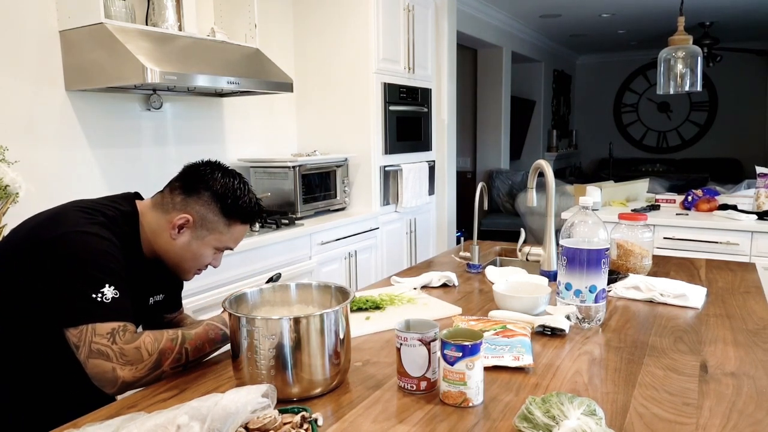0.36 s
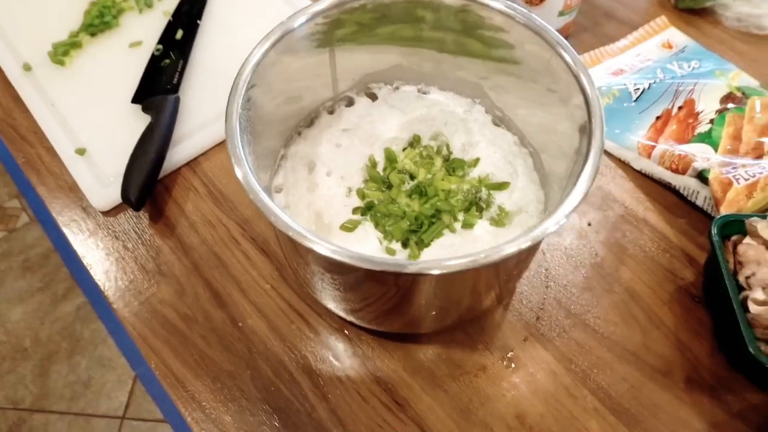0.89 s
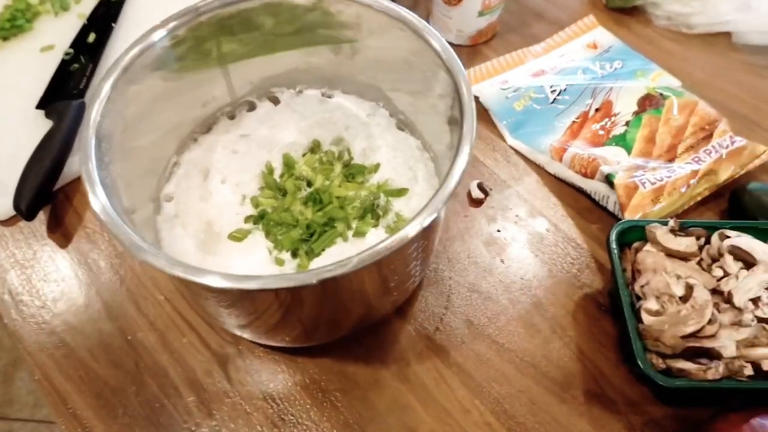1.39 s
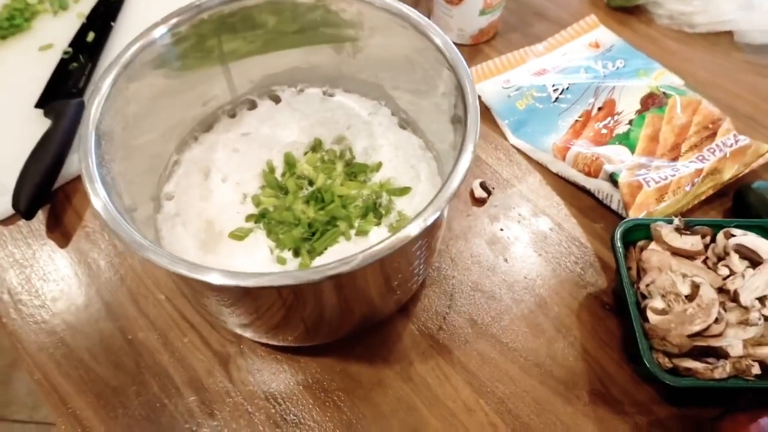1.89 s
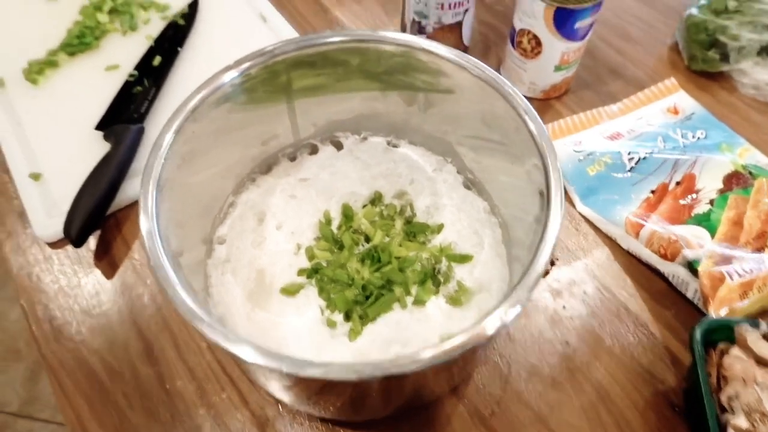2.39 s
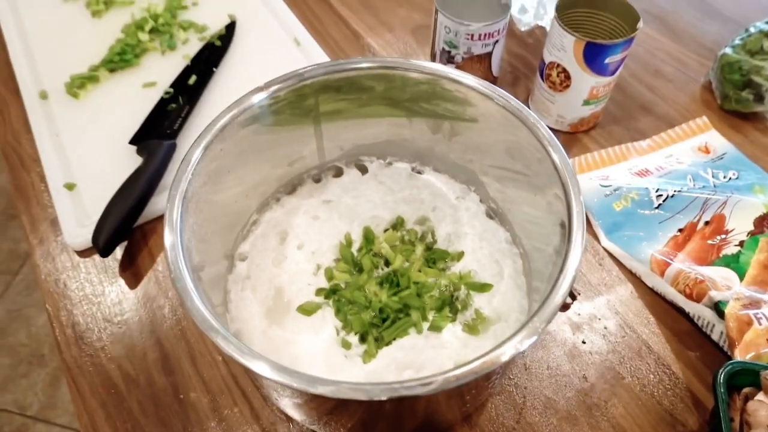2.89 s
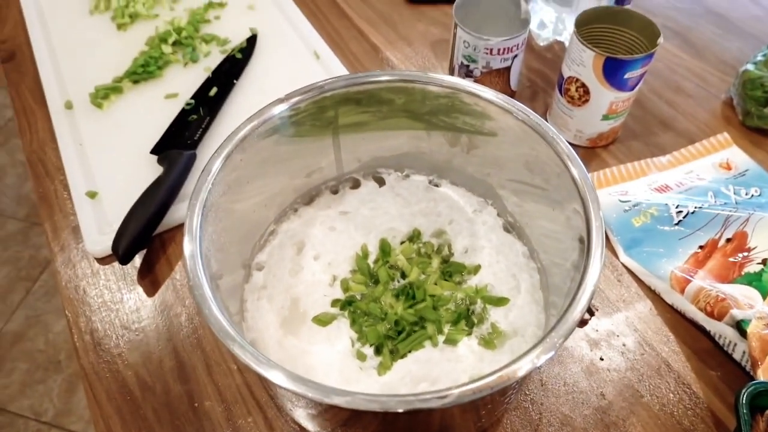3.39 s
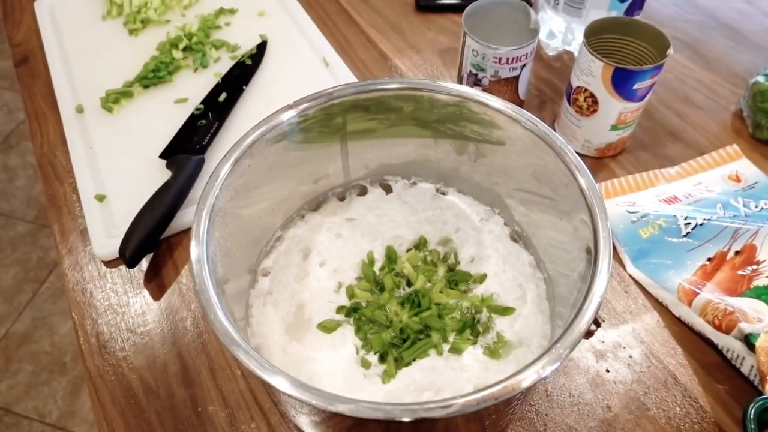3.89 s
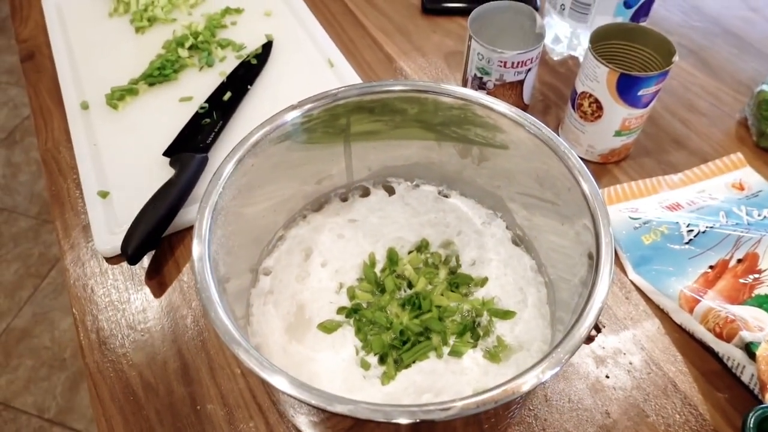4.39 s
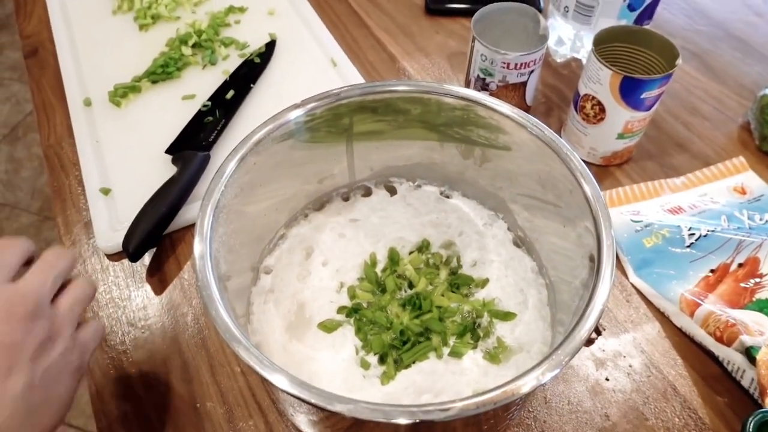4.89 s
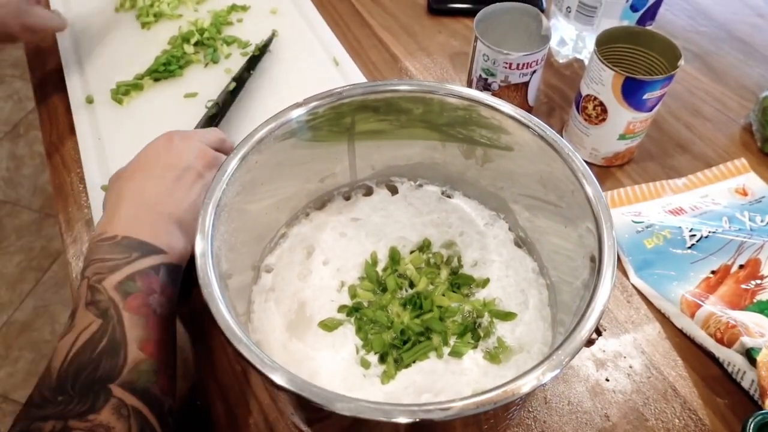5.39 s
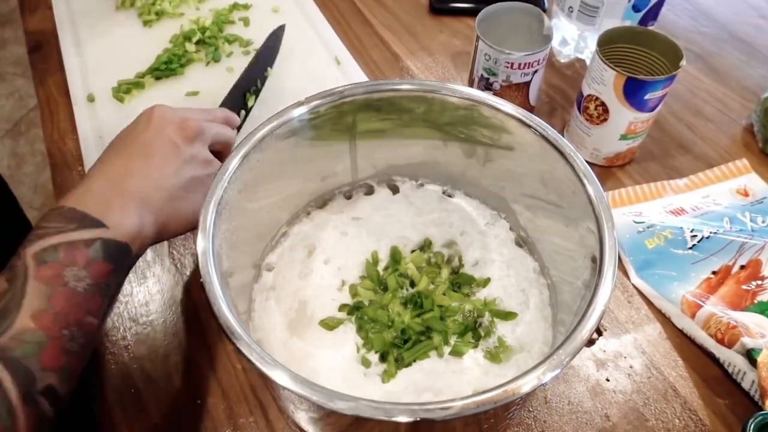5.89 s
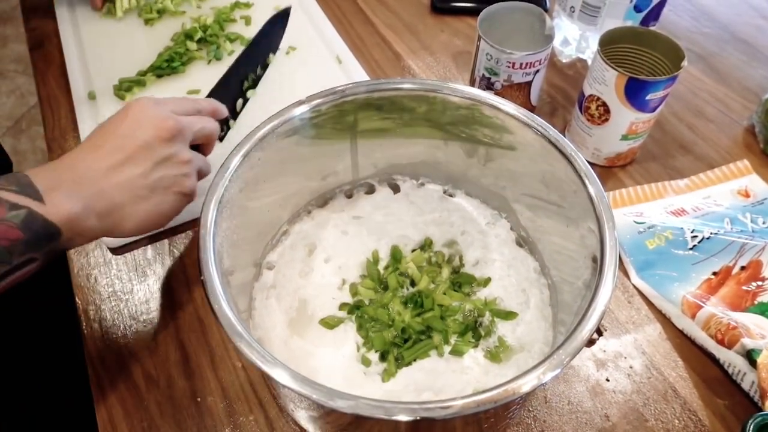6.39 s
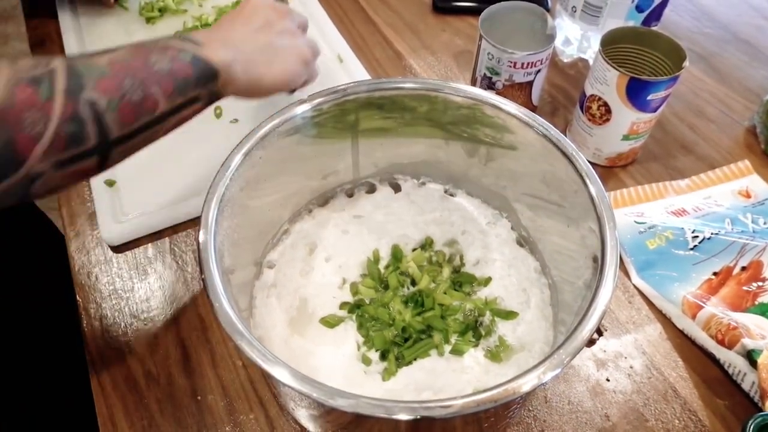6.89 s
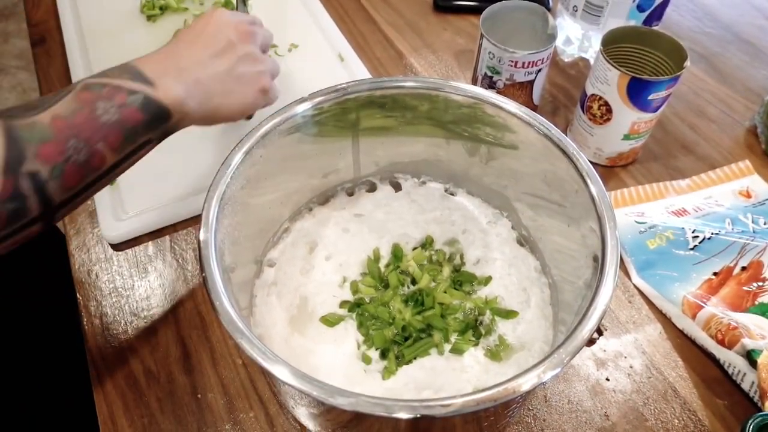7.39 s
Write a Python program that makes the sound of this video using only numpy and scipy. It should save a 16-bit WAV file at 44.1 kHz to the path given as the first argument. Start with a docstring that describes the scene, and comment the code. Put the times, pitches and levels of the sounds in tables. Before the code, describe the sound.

A quiet, hard-walled kitchen, heard close on a small handheld stereo microphone. Faint appliance hum changes abruptly early on as cloth rustles. Irregular hollow knocks and clicks on the microphone's housing follow, with one tiny creak. After a lull with faint brushes, a knife cracks and scrapes on a plastic board in four quick, loud strokes, leaving a short room tail, then a light late contact with a faint ring.

```python
"""Knife and board in a quiet kitchen

A hard-walled kitchen, heard close through a small hand-held stereo microphone. Hum lines waver over steady
shaped noise, and both switch at once to another balance at 0.70 s; cloth rustles in dense grains; pulses and
noise bursts knock and creak the housing in the hand. Then a knife lands and drags on a plastic board: cracks
and chattering clicks ring the board's modes, clear rings and rough buzzes sound on, and a tail of diffuse
noise answers from the room."""
import sys
import numpy as np
from scipy import signal
from scipy.fft import rfft, irfft, next_fast_len
from scipy.io import wavfile
from scipy.ndimage import uniform_filter1d

SR = 44100
rng = np.random.default_rng(int(sys.argv[2]) if len(sys.argv) > 2 else 0)


def output_pcm(signal):
    """Save a mono or channel-first signal as 16-bit PCM at the path in sys.argv[1].

    Samples are clipped to [-1, 1] before scaling.
    """
    pcm = np.clip(np.atleast_2d(signal).T, -1, 1) * 32767
    wavfile.write(sys.argv[1], SR, np.round(pcm).astype(np.int16))


def natural_amplitude(level_db):
    """Convert a level in decibels to a linear amplitude factor, elementwise."""
    exponent = np.asarray(level_db, float) / 20
    return 10 ** exponent


N = 332113

# Knife meeting the board. Each row: start in seconds, landing level in dB, hardness in dB,
# drag level in dB, drag length in seconds.
KNIFE_STROKES = [(5.538, -36.5, -23, -32.5, 0.02), (5.8385, -14, -2.5, -16.5, 0.13),
                 (5.9857, -13.5, -7.5, -16.5, 0.072), (6.1311, -16.5, 3, -15, 0.13),
                 (6.2631, -14.5, -3.5, -17.5, 0.079), (6.962, -54, -1, -37.5, 0.116)]
# Modes of the plastic board. Each row: frequency in Hz, level in dB, decay time t60 in seconds.
BOARD_MODES = [(185, -23.5, 0.069), (271, -5, 0.0037), (455, -6.5, 0.034), (544, 0, 0.006),
               (804, -3.5, 0.025), (1163, 1, 0.01), (1530, 1, 0.0073), (2240, -4, 0.0046),
               (3300, -16, 0.0034), (3860, -15, 0.0059), (5340, -12.5, 0.0017)]
# Colour of the blade edge's hiss. Each row: frequency in Hz, density in dB per Hz.
EDGE_COLOUR = [(1500, -9.5), (3000, -0.5), (6000, -16.5), (10000, -22.5), (15500, -28.5)]
# Short ringing contacts as the knife lands. Each row: start in seconds, level in dB,
# dullness in dB lost per octave above 1 kHz.
KNIFE_CONTACTS = [(5.5373, -27.5, 2), (5.5435, -48.5, 12), (5.556, -46, 12), (6.9658, -28.5, -6),
                  (6.974, -40, -10), (6.9809, -27, 0.5)]
# Modes of the knife. Each row: frequency in Hz, level in dB, decay time t60 in seconds.
KNIFE_MODES = [(250, 0.5, 0.013), (850, 2, 0.012), (1480, 2, 0.015), (2000, -6, 0.0124), (2480, -14, 0.01),
               (3780, -12, 0.0043)]
# Short pitched ticks, and longer clear rings after the last knife stroke. Each row: start in seconds,
# frequency in Hz, level in dB, decay time t60 in seconds.
PITCHED_RINGS = [(1.921, 891, -18, .04), (7.015, 1319, -36.5, 0.75), (6.995, 4590, -51, 0.4),
                 (4.979, 2270, -46, 0.014), (1.949, 4050, -38.5, 0.018), (1.977, 2900, -42, 0.017),
                 (3.572, 1340, -45, 0.08), (6.996, 807, -42, 0.5), (6.995, 3620, -58, 0.3),
                 (6.995, 4040, -56, 0.33)]
# Rough narrow buzzes. Each row: start in seconds, frequency in Hz, level in dB, decay time t60 in seconds.
ROUGH_RATTLES = [(1.776, 955, -37, 0.37), (1.772, 1435, -41, 0.41), (2.385, 3200, -53, 0.65),
                 (5.233, 1170, -51.5, 0.25), (5.385, 2610, -54, 0.23), (5.566, 785, -38.5, 0.3)]
# Knocks on the microphone housing. Each row: start in seconds, clatter level in dB, hollow thud level in dB,
# bright tick level in dB, thud pitch in Hz.
HOUSING_KNOCKS = [(0.787, -25.5, -26, -38, 210), (0.895, -45, -64, -17.5, 196),
                  (1.129, -25.5, -36, -36, 237), (1.247, -56, -33, -37, 224), (1.358, -33, -31, -47, 243),
                  (1.451, -44, -43, -40, 246), (1.474, -26, -29.5, -61, 230),
                  (1.494, -19, -26.5, -30.5, 224), (1.531, -34, -40, -48, 264),
                  (1.544, -29.5, -36, -42, 258), (1.663, -29, -30.5, -36, 292),
                  (1.673, -19.5, -29.5, -26, 232), (1.704, -28, -26.5, -41, 232),
                  (1.765, -19.5, -36.5, -21, 237), (1.895, -23, -28.5, -30, 232),
                  (1.9198, -19.5, -33, -32, 298), (1.949, -31, -33, -29.5, 364),
                  (1.977, -26.5, -32, -35, 225), (2.055, -85, -35.5, -44, 311), (2.119, -76, -33, -70, 282),
                  (2.321, -36.5, -37, -44, 246), (2.356, -25, -32, -70, 348),
                  (2.377, -18.5, -27.5, -25, 247), (2.396, -29, -56, -66, 247),
                  (2.417, -36, -30.5, -64, 275), (2.472, -29.5, -49, -42.5, 302),
                  (2.508, -69, -30.5, -83, 237), (2.550, -35, -42.5, -50, 230), (2.593, -39, -41, -51, 250),
                  (2.638, -35.5, -41, -53, 210), (2.724, -36.5, -40.5, -49, 225),
                  (3.574, -39, -45, -44.5, 210)]
# A creak of the grip. Each row: time in seconds, slips per second, level in dB.
GRIP_CREAK = [(2.121, 240, -66), (2.125, 280, -44), (2.14, 344, -35.5), (2.160, 350, -35),
              (2.172, 390, -45)]
# Modes of the creaking housing. Each row: frequency in Hz, level in dB, decay time t60 in seconds.
CREAK_MODES = [(318, 9.5, 0.026), (960, -4, 0.0036), (1837, -5.5, 0.031), (2670, 0, 0.0017),
               (4030, 1.5, 0.0063), (4500, -2, 0.0055)]
# A long rub of cloth close to the microphone. Each row: time in seconds, level in dB, brightness in dB.
CLOTH_RUB = [(.698, -66, -2.5), (.715, -29.5, 1.5), (.90, -29.5, 1.5), (.94, -31.5, 2), (1.13, -39, 0.5),
             (1.16, -39, 4), (1.24, -36, 4.5), (1.30, -45, 4.5), (1.37, -53.5, 1), (1.5, -60, 4.5),
             (1.9, -59, -24)]
# Short brushes of hand, cloth and blade. Each row: time of full strength in seconds, rise in seconds,
# hold in seconds, level in dB, grain size from 0 (fine) to 2 (coarse).
SHORT_BRUSHES = [(2.724, 0.054, 0.088, -61, 0.5), (3.97, 0.11, 0.036, -55.5, 1.57),
                 (4.636, 0.015, 0.033, -39.5, 0.38), (4.698, 0.086, 0.0039, -34, 1.1),
                 (4.729, 0.019, 0.0031, -33.5, 0.35), (5.147, 0.077, 0.0082, -58, 1.55),
                 (5.226, 0.023, 0.016, -52, 1.64), (5.366, 0.1, 0.091, -53.5, 1.76),
                 (5.515, 0.088, 0.12, -52.5, 0.084), (5.775, 0.013, 0.015, -40.5, 0.74),
                 (6.982, 0.019, 0.058, -38.5, 0.25)]
# Colours of the fine, middle and coarse grains. Each row: frequency in Hz, density in dB per Hz.
FINE_COLOUR = [(6000, -21.5), (9000, -5.5), (12000, -6.5), (15900, -8), (16300, -50)]
MIDDLE_COLOUR = [(2000, -8), (3800, 0), (5500, 0.5), (8000, -3.5), (11000, -29)]
COARSE_COLOUR = [(250, -20.5), (700, -11), (1200, -10), (2500, -11.5), (5000, -24)]
# Sound from all sides at the two capsules. Each row: frequency in Hz, left-right likeness from -1 to 1.
ALL_SIDES_LIKENESS = [(60, .99), (290, .8), (640, .85), (1410, .7), (3100, .3), (6820, -.29), (15000, .25)]
# How long the room rings. Each row: frequency in Hz, decay time t60 in seconds.
ROOM_DECAY = [(150, 0.41), (500, 0.68), (2000, 0.68), (8000, 0.63)]
# The room's ring at the two capsules. Each row: frequency in Hz, left-right likeness from -1 to 1.
ROOM_RING_LIKENESS = [(60, 0.99), (290, 0.98), (640, 0.9), (1410, 0.58), (3100, 0.4), (6820, -0.03),
                      (15000, 0.31)]
# Appliance hum lines. Each row: frequency in Hz, level before the switch in dB rms,
# level after the switch in dB rms, width in Hz.
HUM_LINES = [(58.7, -64.5, -62.5, 3.08), (181, -59.5, -72.5, 9.1), (210, -58, -53.5, 4.37),
             (273, -53, -58.5, 4.22), (367.4, -59, -55, 3.24), (422, -63, -62, 5.9), (573, -88, -68, 3.7),
             (1360, -90, -76, 14.3)]
# Room air and hiss before and after the switch. Each row: frequency in Hz, density in dB per Hz.
FIRST_AIR_COLOUR = [(15, -61), (25, -41), (49, -13.5), (236, -13.5), (270, -7.5), (531, -21.5), (754, -20),
                    (1330, -31), (1700, -34), (5000, -46), (16000, -46.5)]
SECOND_AIR_COLOUR = [(15, -80.5), (25, -40), (53, -12.5), (92, -15), (212, -6.5), (242, -9.5), (363, -6.5),
                     (476, -11.5), (575, -19.5), (840, -22.5), (1330, -27.5), (4000, -37), (16000, -40.5)]
# Room air at the two capsules. Each row: frequency in Hz, left-right likeness from -1 to 1.
ROOM_AIR_LIKENESS = [(40, .997), (180, .98), (400, .9), (1400, .2), (5000, -.05), (15000, .09)]


def rms_one(x):
    """Scale to unit rms."""
    return x / np.sqrt(np.mean(x ** 2) + 1e-20)


def in_time(rows, outside):
    """Columns of a curve at every sample."""
    s, *columns = np.transpose(rows)
    return [np.interp(np.arange(N) / SR, s, c, outside, outside) for c in columns]


def at_hz(points, hz):
    """Read a table on a log-frequency axis."""
    table_hz, values = np.transpose(points)
    return np.interp(np.log(hz + 1), np.log(table_hz), values)


def band(x, low_hz, high_hz):
    """Second-order band-pass."""
    return signal.sosfilt(signal.butter(2, [low_hz, high_hz], "band", fs=SR, output="sos"), x)


def coloured(pair, spectrum, likeness):
    """Two unrelated noises become a left and right of given colour and likeness; joint rms 1."""
    size = next_fast_len(pair.shape[1])
    hz = np.arange(size // 2 + 1) * SR / size
    alike = np.clip(at_hz(likeness, hz), -.999, .999)
    mid, side = rfft(pair, size) * natural_amplitude(at_hz(spectrum, hz))
    mid, side = np.sqrt(1 + alike) * mid, np.sqrt(1 - alike) * side
    return rms_one(irfft([mid + side, mid - side], size)[:, :pair.shape[1]])


def drift(rate):
    """Slow chance: normal draws of spread 1, `rate` per second, joined by straight lines."""
    steps = rng.standard_normal(int(N / SR * rate) + 2)
    return np.interp(np.arange(N), np.linspace(0, N, len(steps)), steps)


def ring(clicks, hz, t60):
    """A damped resonance: a unit click starts a sine of height 1 that dies in t60, 2 ms at the least."""
    radius = natural_amplitude(-60 / (max(t60, .002) * SR))
    w = 2 * np.pi * hz / SR
    return signal.lfilter([0, np.sin(w)], [1, -2 * radius * np.cos(w), radius ** 2], clicks + 1e-18)


def grains(per_s, spread_db):
    """Random clicks of uneven size and sign, in two unrelated draws."""
    sizes = natural_amplitude(spread_db * np.minimum(rng.exponential(1, (2, N)), 5)) * rng.choice([-1, 1], (2, N))
    return sizes * (rng.random((2, N)) < per_s / SR)


def board(clicks):
    """The plastic board: parallel damped modes of alternating sign."""
    return sum((-1) ** k * natural_amplitude(db) * ring(clicks, hz, t60)
               for k, (hz, db, t60) in enumerate(BOARD_MODES))


def knife():
    """The blade lands with a crack, then chatters over the board in dense clicks that ring its modes."""
    drag_loss_db, bite_s, lift_s = 8, 0.0058, 0.007   # loss over a drag; time to bite; time to lift off
    t = np.arange(N) / SR
    drag, bright, landing, hard = np.zeros((4, N))
    for s, landing_db, hard_db, drag_db, length in KNIFE_STROKES:
        since = t - s
        lift = np.clip((length - since) / lift_s, 0, 1)
        bite = (1 - .5 * np.exp(-np.abs(since) / bite_s)) * (since >= 0)
        pressure = bite * lift * natural_amplitude(drag_db - drag_loss_db * np.clip(since / length, 0, 1))
        drag += pressure
        # harder strokes hiss more and crack brighter
        bright += pressure * natural_amplitude(hard_db)
        at = round(s * SR)
        landing[at] = natural_amplitude(landing_db)
        hard[at] = natural_amplitude(landing_db + hard_db)
    chatter = grains(2600, spread_db=3.5)[0] * natural_amplitude(2.0 * drift(90))
    scale = np.sqrt(np.mean(board(chatter) ** 2))
    edge = coloured(grains(4000, spread_db=4.0), EDGE_COLOUR, [(100, 1), (16000, 1)])[0]
    body = natural_amplitude(29.5) * band(band(band(landing, 90, 2200), 90, 2200), 90, 2200)
    crack = natural_amplitude(24.5) * band(hard, 1800, 4400) + natural_amplitude(1.5) * band(hard, 5500, 15000)
    blow = body + crack + natural_amplitude(-6.0) * band(board(landing), 152, 3170)
    return board(chatter * drag) / scale + natural_amplitude(-10.5) * bright * edge + blow


def knife_contacts():
    """Each contact rings the knife's modes with strengths of its own; dull ones favour the low modes."""
    s, db, dull_db = np.transpose(KNIFE_CONTACTS)
    chance = rng.standard_normal((len(s), len(KNIFE_MODES)))
    at = np.round(s * SR).astype(int)
    out = 0
    for k, (hz, mode_db, t60) in enumerate(KNIFE_MODES):
        clicks = np.zeros(N)
        clicks[at] = natural_amplitude(db + mode_db - dull_db * np.log2(hz / 1000) + 1.5 * chance[:, k])
        out = out + ring(clicks, hz, t60)
    return out


def dying(s, db, t60):
    """Envelope: a very short rise, then exponential decay."""
    since = np.arange(N) / SR - s
    return np.clip(since / 0.00063, 0, 1) * natural_amplitude(db - 60 * np.clip(since, 0, None) / t60)


def narrow(hz, t60):
    """Noise through one resonance twice; rms 1."""
    return rms_one(ring(ring(rng.standard_normal(N), hz, t60), hz, t60))


def rings_and_rattles():
    """A ring is a sine amid narrow noise at its pitch, so it wobbles as it dies; a rattle is wider noise alone."""
    crowd, rattle_t60 = .5, .012   # level of noise around a ring's sine; seconds a rattle's resonance sounds
    t = np.arange(N) / SR
    out = np.zeros(N)
    for s, hz, db, t60 in PITCHED_RINGS:
        out += dying(s, db, t60) * (np.sin(2 * np.pi * hz * t) + crowd * narrow(hz, .05))
    for s, hz, db, t60 in ROUGH_RATTLES:
        out += dying(s, db, t60) * narrow(hz, rattle_t60)
    return out


def placed(x, left_db, lag):
    """A near source: left louder by left_db and later by `lag` samples (earlier where negative)."""
    i = np.arange(N)
    return np.array([natural_amplitude(left_db / 2) * np.interp(i - lag, i, x), natural_amplitude(-left_db / 2) * x])


def knocks():
    """Each knock: a hollow thud that swells, a contact and brief clatter in a broad resonance, a bright tick."""
    modes_hz, clatter_t60 = np.array([907, 1343]), .02   # the two clatter modes; seconds
    even_at_db = -5   # sets the tick level, against the clatter, at which the modes are equal
    t, out = np.arange(3000) / SR, np.zeros(N)
    noise = rng.standard_normal((len(HOUSING_KNOCKS), 2, len(t)))
    for (s, clatter_db, thud_db, tick_db, thud_hz), (rough, sharp) in zip(HOUSING_KNOCKS, noise):
        thud = t / 0.0076 * np.exp(1 - t / 0.0067) * np.sin(2 * np.pi * thud_hz * t)
        contact = rough * t * np.exp(-t / 0.0021)   # builds over a moment
        # each knock's two clatter modes are shifted at random by up to 7 %
        low_hz, high_hz = modes_hz * (1 + .07 * np.tanh(rough[-2:]))
        # brighter knocks favour the upper mode
        upper = 1 / (1 + natural_amplitude(clatter_db + even_at_db - tick_db))
        low_mode = (1 - upper) * ring(contact, low_hz, clatter_t60)
        high_mode = upper * ring(contact, high_hz, clatter_t60)
        burst = low_mode + high_mode + 15.4 * upper * band(band(contact, 750, 2350), 900, 2260)
        tick = band(sharp, 1500, 4500) * np.exp(-t / 0.007)
        at = round(s * SR)
        out[at - 100:at + 2900] += natural_amplitude(thud_db + 4) * thud   # the swell starts ahead of the contact
        out[at:at + 3000] += natural_amplitude(clatter_db) * burst / np.abs(burst).max()
        out[at:at + 3000] += natural_amplitude(tick_db) * tick / np.abs(tick).max()
    return out


def creak():
    """Stick and slip: pulses ring the lowest housing mode, friction noise throbbing with them fills the others."""
    per_s, db = in_time(GRIP_CREAK, None)
    turns = np.cumsum(per_s * (1 + .05 * drift(400))) / SR
    gain = natural_amplitude(db) * (np.abs(np.arange(N) / SR - 2.145) < .03)   # heard only around 2.145 s
    slips = np.diff(np.floor(turns), prepend=0) * natural_amplitude(2.0 * rng.standard_normal(N)) * gain
    friction = .3 * rng.standard_normal(N) * (1 + .8 * np.cos(2 * np.pi * turns)) * gain
    (low_hz, low_db, low_t60), *upper = CREAK_MODES
    out = natural_amplitude(low_db) * ring(slips, low_hz, low_t60)
    for hz, mode_db, t60 in upper:
        out = out + natural_amplitude(mode_db) * ring(friction, hz, t60)
    return out + natural_amplitude(-27) * band(band(friction, 6000, 9200), 6000, 9200)


def in_housing(x):
    """Sound through the housing reaches the two capsules with a gap in phase, except in the bass."""
    without_bass = x - uniform_filter1d(x, size=200)
    quarter_turn = signal.hilbert(without_bass, next_fast_len(N)).imag[:N]
    side = natural_amplitude(-3) * quarter_turn   # how unlike the housing shakes the capsules
    return np.array([natural_amplitude(-1.3) * (x + side), x - side])


def grip():
    """Every knock shakes the hand: a lump of low rumble, alike in both channels."""
    shake_db, rise_s = -15.5, 0.014   # against the knock's thud; time to full strength
    jolts, r = np.zeros(N), np.exp(-1 / (rise_s * SR))
    for s, _, thud_db, *_ in HOUSING_KNOCKS:
        jolts[round(s * SR)] = natural_amplitude(thud_db + shake_db)
    shake = np.e * (1 - r) * signal.lfilter([1], [1, -2 * r, r * r], jolts)
    return shake * rms_one(band(rng.standard_normal(N), 28, 75))


def rustle():
    """Fibres slip in very dense grains of three sizes, the finest brightest."""
    climb_db, fall_db_per_s = 25, 104.5   # climb over a brush's rise; dying away of the middle grains
    off_size_db, fine_falls_faster = 12.5, 0.42   # loss one size off; share by which finer grains die sooner
    t, sizes = np.arange(N) / SR, np.arange(3)[:, None]
    rub_db, bright_db = in_time(CLOTH_RUB, -120)
    power = natural_amplitude(rub_db + np.clip(bright_db, -9, 9) * (1 - sizes)) ** 2
    fall = fall_db_per_s * (1 + fine_falls_faster * (1 - sizes))
    for s, rise, hold, db, size in SHORT_BRUSHES:
        shape_db = -climb_db * np.maximum(s - t, 0) / rise - fall * np.maximum(t - s - hold, 0)
        power += natural_amplitude(db - off_size_db * (sizes - size) ** 2) ** 2 * natural_amplitude(shape_db) ** 2
    flutter = natural_amplitude(1.0 * drift(35))
    out = 0
    for gain, colour in zip(np.sqrt(power), (FINE_COLOUR, MIDDLE_COLOUR, COARSE_COLOUR)):
        fibres = coloured(grains(14000, spread_db=2.0), colour, ALL_SIDES_LIKENESS)
        out = out + gain * flutter * fibres
    return out


def room(x):
    """Reverberation: diffuse noise that swells for a moment and dies band by band."""
    t = np.arange(SR) / SR
    noise = coloured(rng.standard_normal((2, SR)), [(100, 0), (16000, 0)], ROOM_RING_LIKENESS)
    edges, tail = 125 * 2. ** np.arange(8), 0   # octaves from 125 Hz
    for k, (low, high) in enumerate(zip(edges, edges[1:])):
        decay = natural_amplitude(-60 * t / at_hz(ROOM_DECAY, np.sqrt(low * high)))
        tail = tail + (-1) ** k * band(noise, low, high) * decay
    tail = tail * (1 - np.exp(-t / 0.0047))
    return signal.fftconvolve(x[None], tail / np.sqrt(np.sum(tail ** 2) / 2), axes=1)[:, :N]


def background():
    """Wavering hum lines over steady air; at 0.70 s both cut at once to another background."""
    switch_s, air_db = .70, -51   # the air has this rms on either side of the switch
    later = np.arange(N) >= switch_s * SR
    first_air, second_air = [natural_amplitude(air_db) * coloured(rng.standard_normal((2, N)), colour, ROOM_AIR_LIKENESS)
                             for colour in (FIRST_AIR_COLOUR, SECOND_AIR_COLOUR)]
    out = np.where(later, second_air, first_air)
    for hz, first_db, second_db, width_hz in HUM_LINES:
        phase = 2 * np.pi * np.cumsum(hz + .5 * width_hz * drift(13)) / SR
        level = natural_amplitude(np.where(later, second_db, first_db) + 2.83 * drift(7.0))
        out = out + np.sqrt(2) * level * np.sin(phase)
    return out


def scene():
    """Knife and housing sound directly and through the room; rings, rattles, rustle and rumble only directly."""
    housing = knocks() + band(creak(), 170, 15000)
    blade = band(knife() + knife_contacts(), 126, 18000)
    # little of the housing's knocks reaches the walls
    sent = natural_amplitude(-12) * housing + natural_amplitude(-2.0) * blade
    # two random echo patterns trade places steadily at 3 Hz, so the tail sounds less tonal
    turn = 2 * np.pi * 3 * np.arange(N) / SR
    wet = room(sent * np.cos(turn)) + room(sent * np.sin(turn))
    direct = natural_amplitude(1.5) * placed(blade + rings_and_rattles(), left_db=0.5, lag=-1.2)
    return background() + rustle() + grip() + in_housing(housing) + direct + wet


def top_cut(x):
    """Nothing passes above the cut-off."""
    return signal.sosfilt(signal.butter(12, 16810, fs=SR, output="sos"), x)


def record(dry):
    """The microphone rounds the peaks and drops the top and the deepest bass."""
    rounded = 1.1 * np.tanh(dry / 1.1)
    no_top = signal.sosfilt(signal.cheby2(12, 60, 16500, fs=SR, output="sos"), rounded)
    mix = signal.sosfilt(signal.butter(2, 30, "high", fs=SR, output="sos"), no_top)
    return top_cut(mix)


dry = scene()
out = record(dry)
output_pcm(out)
```